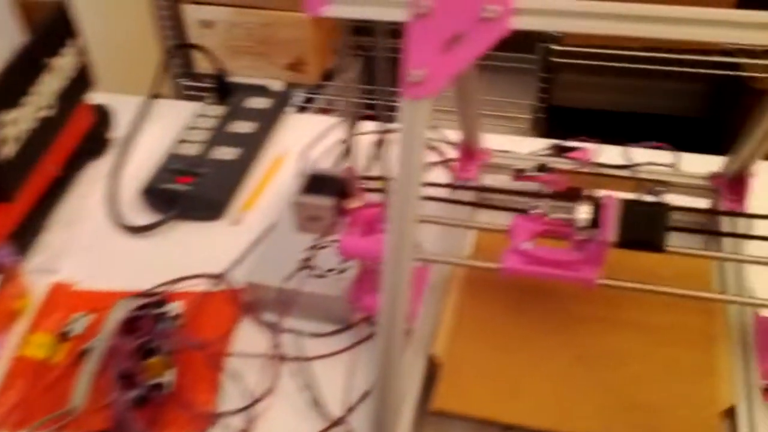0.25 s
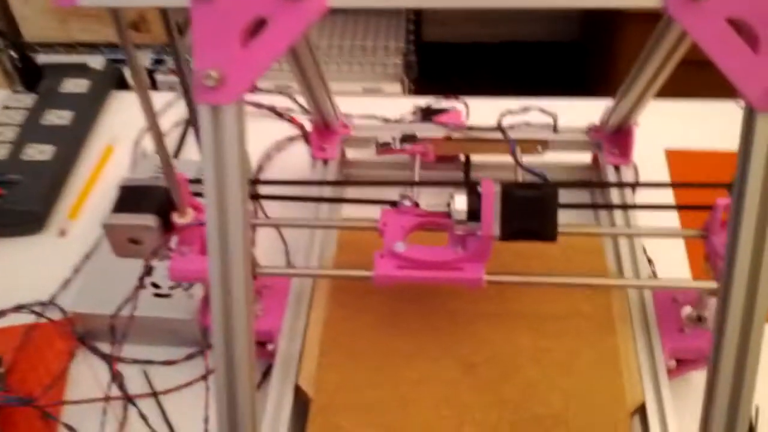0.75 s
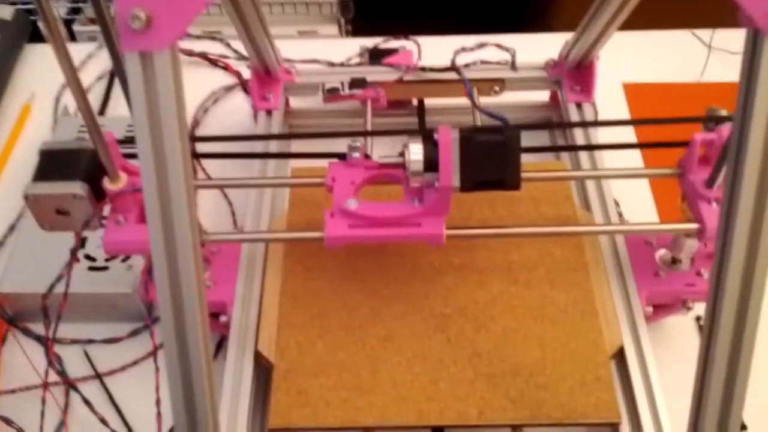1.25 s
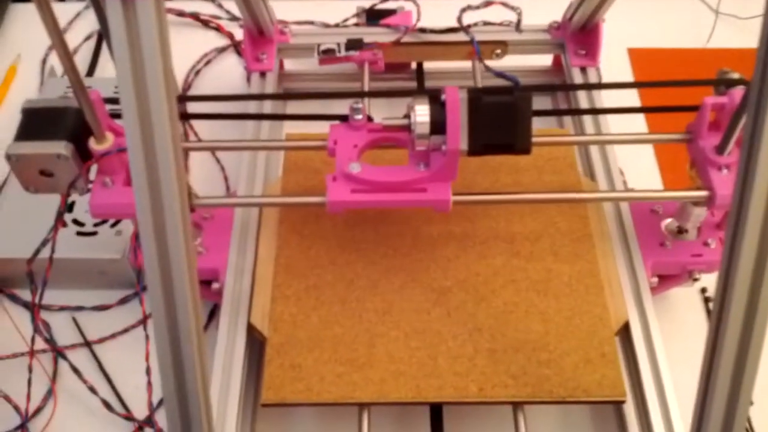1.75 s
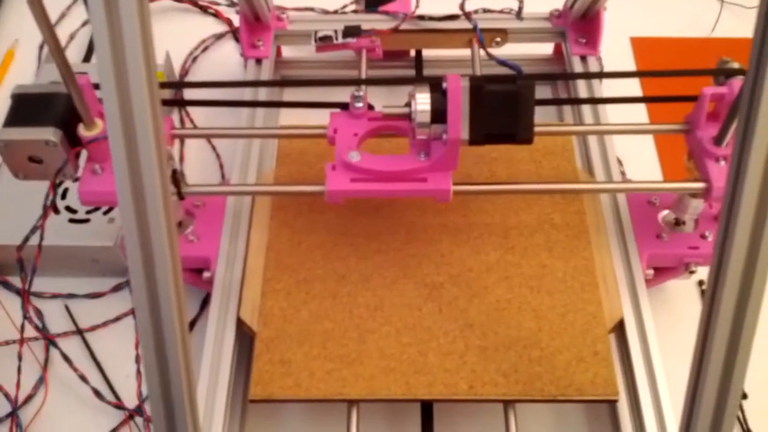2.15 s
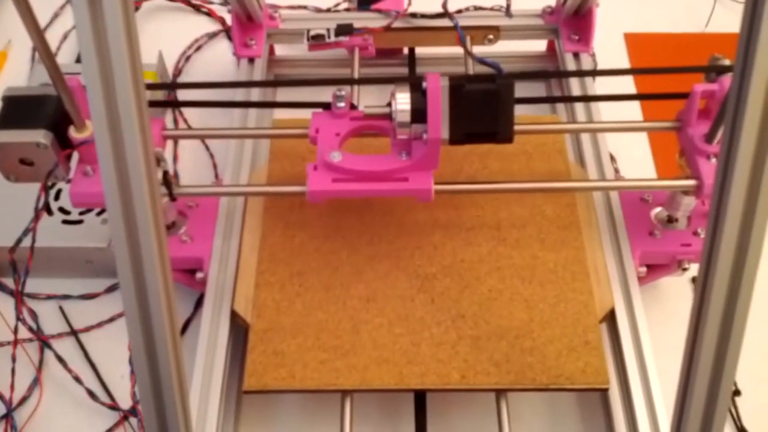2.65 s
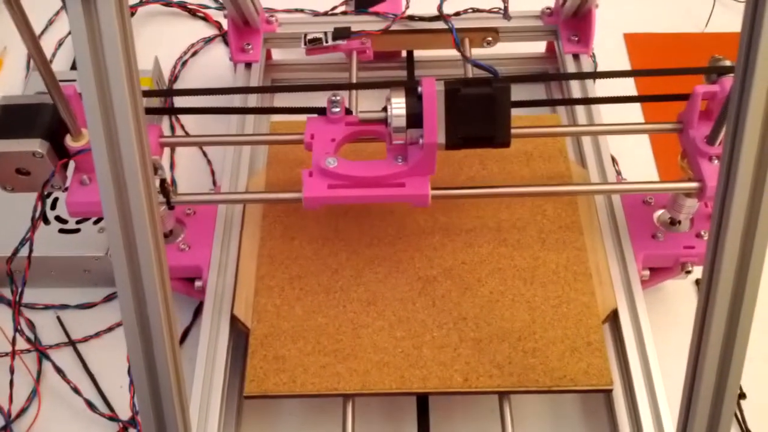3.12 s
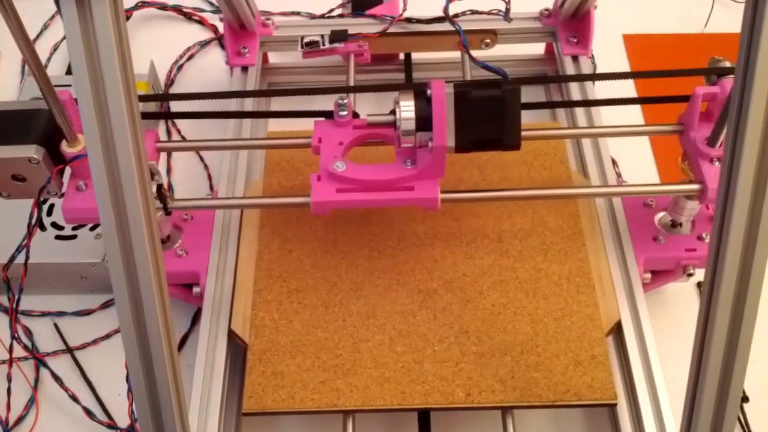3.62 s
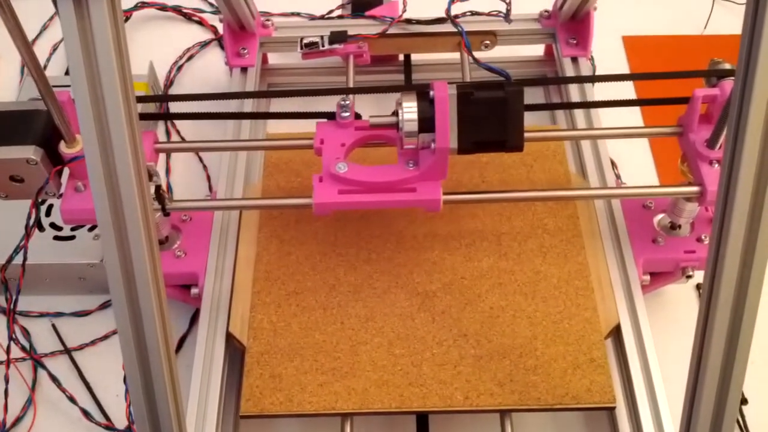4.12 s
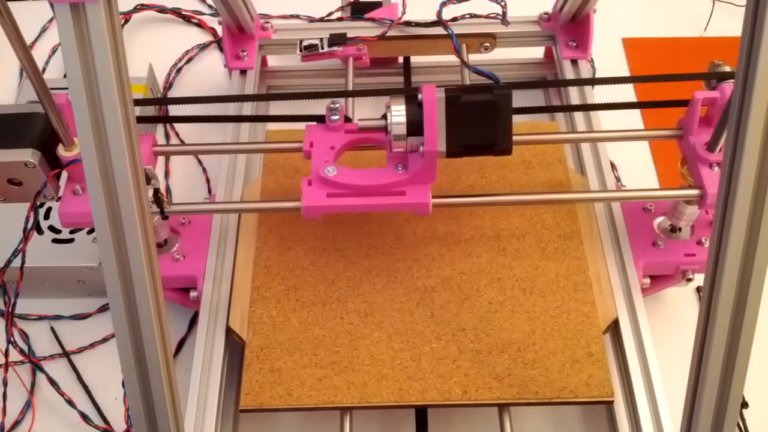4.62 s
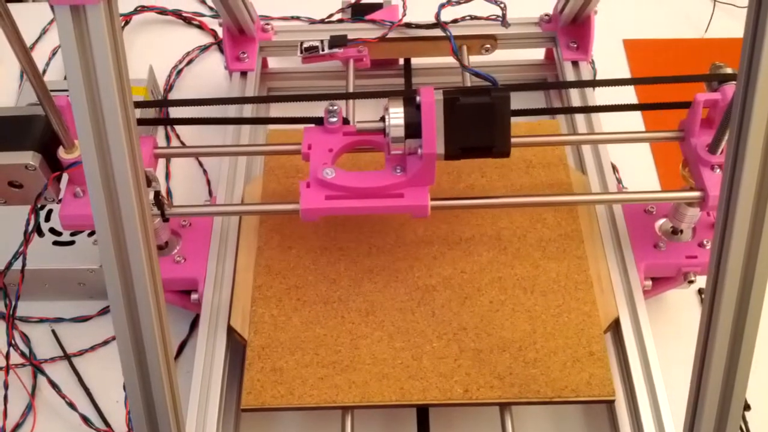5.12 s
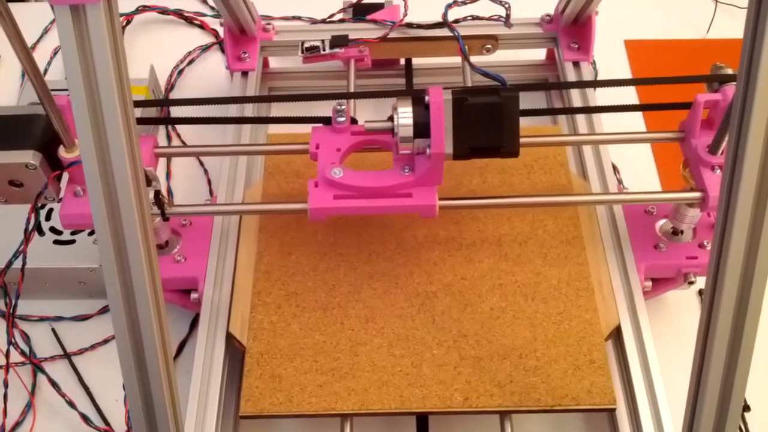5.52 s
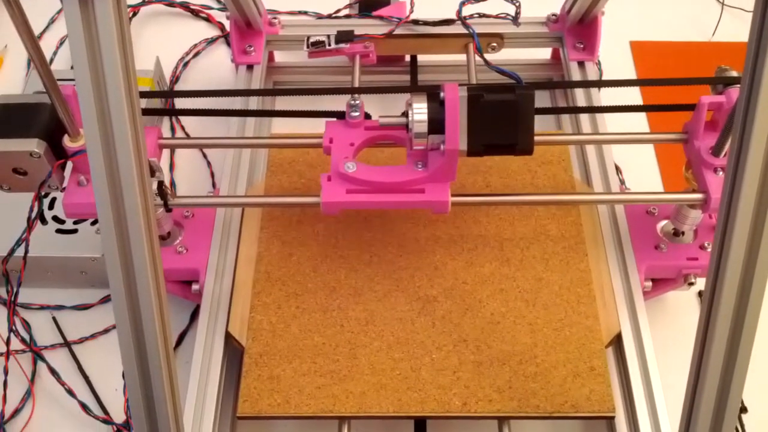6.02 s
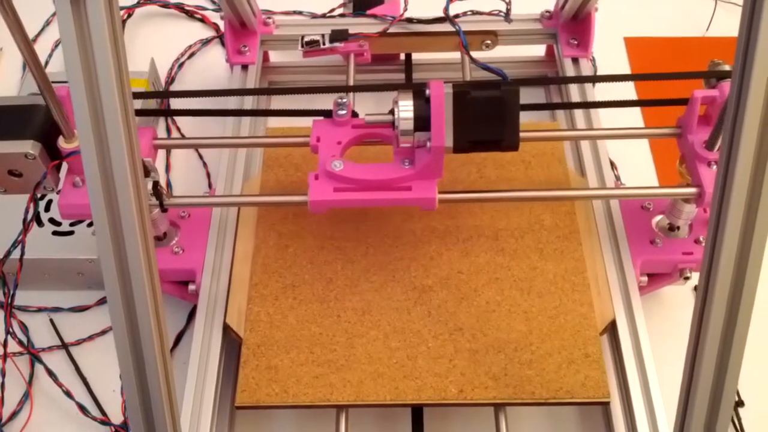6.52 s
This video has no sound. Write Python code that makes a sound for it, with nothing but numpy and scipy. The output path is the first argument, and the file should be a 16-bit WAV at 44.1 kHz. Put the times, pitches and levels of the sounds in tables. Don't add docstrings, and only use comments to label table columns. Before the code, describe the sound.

A desktop printer's motors sing a steady high whine over a low frame hum, broken about once a second by quick side-step chirps and knocks.

```python
import sys
import numpy as np
from scipy import signal
from scipy.fft import rfft, irfft, next_fast_len
from scipy.io import wavfile
from scipy.ndimage import uniform_filter1d

SR = 44100
rng = np.random.default_rng(int(sys.argv[2]) if len(sys.argv) > 2 else 0)


def file_out(sig):
    cols = np.atleast_2d(sig).T
    lim = np.clip(cols, -1, 1)
    pcm = np.round(lim * 32767).astype(np.int16)
    wavfile.write(sys.argv[1], SR, pcm)


def voltage_ratio(decibels):
    exponent = np.asarray(decibels, float) / 20
    return 10 ** exponent


N = 298109

STEP_HZ = 2030.1

# (start [s], end [s], middle tones [dB], treble as the microphone turns [dB], bearing chatter [dB])
STROKES = [
    (-.1, 0.021, -1, -12, -75),
    (0.101, 0.63, -2.5, -7, -87.5),
    (0.71, 1.318, -1, -4.5, -69),
    (1.397, 2.09, -0.5, 0, -73.5),
    (2.172, 2.942, -0.5, -0.5, -70.5),
    (3.029, 3.883, 0.5, 0, -89),
    (3.966, 4.91, 0, 0, -70.5),
    (4.99, 6.016, 0.5, 1, -93),
    (6.094, 7.006, 1, 1.5, -71),
]
# (frequency [Hz], density [dB per Hz])
HISS = [(25, 0), (70, -3), (140, 3), (280, -0.5), (450, -11.5), (750, -5.5), (1300, -5.5), (1800, -12),
        (2300, -6.5), (3200, -17), (7500, -15.5), (10500, -4), (13000, -15), (16000, -11)]
# (time [s], peak level [dB], shake of table and hand [dB])
TAKE_UPS = [
    (0.702, -33, 0),
    (2.165, -30, -8),
    (3.958, -32, -5),
    (6.088, -34, -4),
]


def unit(x):
    return x / np.sqrt(np.mean(x ** 2) + 1e-20)


def in_time(rows):
    s, *columns = np.transpose(rows)
    return [np.interp(np.arange(N) / SR, s, column) for column in columns]


def colour(x, spectrum, peaks=()):
    hz, db = np.transpose(spectrum)
    size = next_fast_len(len(x))
    grid = np.maximum(np.fft.rfftfreq(size, 1 / SR), 1)
    curve_db = np.interp(np.log(grid), np.log(hz), db)
    for centre, width, peak_db in peaks:
        curve_db += peak_db * np.exp(-2 * ((grid - centre) / width) ** 2)
    return unit(irfft(rfft(x, size) * voltage_ratio(curve_db), size)[:len(x)])


def noise(spectrum, peaks=()):
    return colour(rng.standard_normal(N), spectrum, peaks)


def drift(rate):
    knots = rng.standard_normal(400)
    return np.interp(np.arange(N) / SR * rate, np.arange(400), knots)


def add(out, s, x):
    i = min(int(round(s * SR)), N)
    out[i:i + len(x)] += x[:N - i]


def ring(hz, t60, rise, count=2500):
    t = np.arange(count) / SR
    x = np.sin(2 * np.pi * hz * t) * voltage_ratio(-60 * t / t60) * (1 - np.exp(-t / rise))
    return x / np.max(np.abs(x))


def burst(spectrum, decay, rise=0.000097):
    t = np.arange(1500) / SR
    return colour(rng.standard_normal(1500), spectrum) * np.exp(-t / decay) * (1 - np.exp(-t / rise))


def gate(t, start, end, rise, fall):
    return (1 - np.exp(-np.maximum(t - start, 0) / rise)) * np.exp(-np.maximum(t - end, 0) / fall)


def shaken(rest_db, shaken_db, rise, calm):
    t = np.arange(N) / SR
    tremble = sum(voltage_ratio(shaken_db + db) * gate(t, s, s + rise, rise / 2, calm) for s, _, db in TAKE_UPS)
    return voltage_ratio(rest_db) + tremble


def room(x):
    t60_s, gap_s, level_db = 0.14, 0.004, -9
    t = np.arange(SR // 4) / SR
    tail = colour(rng.standard_normal(len(t)), [(150, -17), (500, -1), (3000, -6), (12000, -8)])
    tail *= voltage_ratio(-60 * t / t60_s) * (t > gap_s)
    tail /= np.sqrt(np.sum(tail ** 2))
    return x + voltage_ratio(level_db) * signal.fftconvolve(x, tail)[:N]


def hiss():
    # (frequency [Hz], width [Hz], level [dB])
    top_peaks = [(2640, 440, -15), (5730, 180, -0.5), (7330, 223, -6.5), (8560, 140, -5.5), (9400, 250, -9),
                 (9860, 310, 4), (10500, 1000, -3.5), (12310, 340, 7.5), (12500, 450, -4), (14020, 480, 6)]
    air = noise(HISS, top_peaks)
    top = signal.sosfilt(signal.butter(4, 8500, "high", fs=SR, output="sos"), air)
    air += top * (voltage_ratio(0.48 * drift(44.0)) - 1)
    table = noise([(220, -49), (310, 7.5), (480, 1.0), (700, 5.0), (1000, -57)])
    hand = noise([(10, -20.5), (35, 2), (70, 1), (120, -38)])
    table *= shaken(rest_db=-70.5, shaken_db=-65, rise=0.22, calm=0.18)
    hand *= shaken(rest_db=-80, shaken_db=-70, rise=0.5, calm=0.01)
    return voltage_ratio(-57) * air + table + hand


def hand_brush():
    # (time [s], level [dB])
    brush_course = [
        (1.5, -90),
        (1.506, -51),
        (1.525, -49),
        (1.55, -53),
        (1.575, -58),
        (1.6, -66),
    ]
    # (frequency [Hz], density [dB per Hz])
    brush_colour = [(710, -66), (1200, -24), (1980, -8.5), (2150, -13), (3950, -17.5), (5130, -23),
                    (10400, -20), (16000, -23)]
    return voltage_ratio(in_time(brush_course)[0] + 2.0 * drift(49.0)) * noise(brush_colour)


def fan_rub():
    # (time [s], level [dB])
    rub_course = [(0, -58), (.15, -46.5), (.45, -49.5), (.65, -51.5), (1.2, -58), (2.0, -56), (3.0, -55),
                  (4.0, -53.5), (6.76, -57)]
    # (frequency [Hz], density [dB per Hz])
    rub_colour = [(9000, -27.5), (10300, -7), (11200, 0.5), (12100, -3.5), (15500, -32)]
    # (frequency [Hz], density [dB per Hz])
    housing_colour = [(1500, -30), (2300, 1), (2900, -3), (3600, -7.5), (5000, -32)]
    fan_hz, first_s = 20.55, 0.0016
    out = voltage_ratio(in_time(rub_course)[0] - 16.5) * noise(rub_colour)

    turned_db, = in_time([((start + end) / 2, treble_db) for start, end, _, treble_db, _ in STROKES])
    out += voltage_ratio(-78 - 0.87 * turned_db) * noise(housing_colour)

    for k, s in enumerate(np.arange(first_s, N / SR, 0.5 / fan_hz)):
        size, late, pitch = rng.standard_normal(3)
        db = np.interp(s, *np.transpose(rub_course)) - 10 * (k % 2) + 1 + 2.5 * size
        scuff = burst(rub_colour, 0.005, rise=0.002)
        scuff += 0.35 * ring(11300 * 1.025 ** pitch, 0.035, 0.002, count=1500)
        click = burst([(8000, -25), (10500, 0), (14500, -2), (16000, -8)], 0.0012)
        scuff[130:] += 0.68 * click[:-130]
        add(out, abs(s - 0.003 + 0.00086 * late), voltage_ratio(db) * scuff)
    return out


def chatter():
    out = np.zeros(N)
    for start, end, _, _, chatter_db in STROKES[1:]:
        times = np.arange(start + 0.03, min(end, N / SR), 32 / STEP_HZ)
        for s, (size, pitch, late) in zip(times, rng.standard_normal((len(times), 3))):
            db = chatter_db + 13 + 4 * size - 10 * (s - start)
            tick = ring(1280 * 1.05 ** pitch, 0.025, 0.0004) + 0.9 * ring(960 * 1.08 ** late, 0.03, 0.0003)
            tick[:1500] += 0.438 * burst([(400, 3), (700, 26), (1450, -13), (1800, -18)], 0.0083)
            add(out, s + 0.00146 * late, voltage_ratio(db) * tick[:1500])
    return out


def knocks():
    # (delay [s], level [dB], ring frequency [Hz])
    rebounds = [
        (0, -2.5, 1290),
        (.005, -11, 1150),
        (.039, -8, 990),
        (.062, -14, 1020),
    ]
    # (time [s], peak level [dB])
    stops = [
        (0.087, -44),
        (1.322, -34.5),
        (2.094, -44),
        (3.012, -42),
        (3.891, -43),
        (4.911, -34),
        (4.933, -36.5),
        (6.019, -44),
    ]
    # (time [s], peak level [dB], part [1 belt clamp or 0 bearing])
    rattles = [(0.819, -46, 0.14), (0.866, -47, 0), (1.022, -44, 0.039), (1.056, -39, 0),
               (1.212, -44, 0.12), (2.454, -41, 1), (2.487, -41, 0), (2.52, -44, 0), (2.738, -44, 1),
               (2.77, -44, 0), (4.077, -43.5, 1), (4.125, -40, 0), (4.234, -44, 1), (4.313, -41, 0.01),
               (6.205, -33, 0), (6.331, -40, 1), (6.362, -41, 0), (6.408, -46, 1), (6.441, -42, 1)]
    stop_hz, bearing_hz, clamp_hz = 1230, 980, 1294
    events = [(s + late, db + loss_db, hz) for s, db, _ in TAKE_UPS for late, loss_db, hz in rebounds]
    events += [(s, db, stop_hz) for s, db in stops]
    events += [(s, db, clamp_hz if clamp else bearing_hz) for s, db, clamp in rattles]
    out = np.zeros(N)
    for s, db, hz in events:
        body = ring(hz, 0.019, 0.000098)
        body += 0.74 * ring(hz * 0.74, 0.0036, 0.00017)
        body += 0.068 * ring(524, 0.027, 0.001)
        body[:1500] += 0.39 * burst([(500, -18), (1000, 23.5), (1600, -7), (3000, 6), (6000, -22)], 0.0084)
        add(out, s, -voltage_ratio(db - 5.5) * body)
    return out


def ticks_and_snaps():
    # (time [s], peak level [dB], broad crack [dB])
    ticks = [(0.6993, -50.5, 0.5), (1.378, -59, 6), (2.1046, -51, -5), (2.1264, -61, -6),
             (2.1541, -46.5, -8.5), (2.161, -62, -5), (3.9502, -43.5, -11), (4.9097, -56, -4),
             (5.1004, -57, -1), (6.0789, -37.5, -5.5), (6.2047, -65, -1)]
    # (time [s], peak level [dB])
    snaps = [
        (0.4344, -42),
        (1.709, -42),
        (1.7529, -47),
        (2.9894, -44),
        (4.2692, -41),
        (5.5493, -42),
        (5.69, -46),
    ]
    out = np.zeros(N)
    for s, db, crack_db in ticks:
        add(out, s, voltage_ratio(db - 3.0) * ring(3590, 0.015, 0.00045))
        add(out, s, voltage_ratio(db + crack_db) * burst([(1500, 4.5), (7000, -1.5), (9000, -16)], 0.012))
    for s, db in snaps:
        add(out, s, voltage_ratio(db - 5) * burst([(7000, -20), (9000, -3), (11500, 0), (15500, -4)], 0.002))
    return out


def jolts():
    # (time [s], level [dB])
    line_starts = [
        (.1, -44.5),
        (0.702, -48),
        (1.381, -39.5),
        (2.162, -45.5),
        (3.021, -44.5),
        (3.961, -45),
        (4.98, -42.5),
        (6.105, -45.5),
    ]
    # (first [Hz], second: delay [s], level [dB], frequency [Hz])
    swings = [
        (233, 0.023, -16, 153),
        (169, 0.0369, 0, 133),
    ]
    mode = dict(t60=0.12, rise=0.003, count=10000)
    out = np.zeros(N)
    for j, (s, db) in enumerate(line_starts):
        hz, late, second_db, second_hz = swings[j % 2]
        add(out, s, voltage_ratio(db) * ring(hz, **mode))
        add(out, s + late, voltage_ratio(db + second_db) * ring(second_hz, **mode))
    return out


def side_steps():
    # (step tone [dB], 2nd [dB], 3rd harmonic [dB], whistle [dB], braking [dB])
    step_levels = [
        (-69, -70, -68.5, -79, -67),
        (-63, -79, -80, -58.5, -57.5),
    ]
    # (time after line end [s], share of side-step rate [1], level [dB])
    brake_stages = [
        (.042, .8, 0),
        (.052, .6, -2),
        (.063, .4, -4),
        (.074, .58, -5),
    ]
    # (frequency [Hz], density [dB per Hz])
    shudder_colour = [(40, -8), (170, 11.5), (330, 1), (700, -2), (1300, -6.5), (2400, -14), (4500, -28),
                      (8000, -37)]
    # (time after line end [s], level [dB])
    shudder_course = [(0, -4), (.01, 0.5), (.05, -2), (.075, 3.5), (.1, -1.5), (.16, -8), (.25, -51)]
    whistle_hz = 10970
    flicker_db = 4.0
    facing_share = 0.32
    shudder_levels_db = (-54, -53)

    out, t = np.zeros(N), np.arange(int(0.25 * SR)) / SR
    stage_s, share, stage_db = np.transpose(brake_stages)
    stage = np.searchsorted(stage_s, t)
    rate_hz = np.sqrt(2) * STEP_HZ * uniform_filter1d(np.r_[1, share][stage], size=70)
    brake_level = uniform_filter1d((stage > 0) * voltage_ratio(np.r_[0, stage_db][stage]), size=90)
    brake_level *= gate(t, 0, 0.091, 0.001, 0.0045)
    cruising = gate(t, 0, stage_s[0], 0.001, 0.012)
    whistling = gate(t, 0, 0.063, 0.0032, 0.0037) * np.sin(2 * np.pi * whistle_hz * t)
    course = voltage_ratio(np.interp(t, *np.transpose(shudder_course)))

    for j, (_, end, _, treble_db, _) in enumerate(STROKES[:-1]):
        near = 1 - j % 2
        *harmonics_db, whistle_db, braking_db = step_levels[near]
        facing_db = facing_share * treble_db
        uneven = np.repeat(rng.standard_normal(len(t) // 60 + 1), 60)[:len(t)] * (stage > 0)
        turn = 2 * np.pi * np.cumsum(rate_hz * (1 + 0.044 * uneven)) / SR
        flicker = flicker_db * uniform_filter1d(uneven, size=120)
        x = voltage_ratio(braking_db + flicker) * brake_level * (np.sin(turn) + 0.2 * np.sin(2 * turn))
        for k, db in enumerate(harmonics_db):
            tone = np.sin((k + 1) * 2 * np.pi * rate_hz[0] * t)
            x += voltage_ratio(db + facing_db * (k > 0)) * cruising * tone
        x += voltage_ratio(whistle_db + facing_db) * whistling
        shudder = course * colour(rng.standard_normal(len(t)), shudder_colour)
        add(out, end, np.sqrt(2) * x + voltage_ratio(shudder_levels_db[near]) * shudder)
    return out


def motors():
    # (multiple of the electrical cycle [1], level on lines out [dB], on lines back [dB])
    orders = [(3, -72, -73), (4.5, -80, -75), (6, -73, -74), (7, -73, -69), (10.5, -76, -65),
              (21, -71, -73), (22, -74, -76), (36, -70, -68), (40, -67, -68), (53.5, -72, -87),
              (76, -98, -83), (104, -87, -85), (108, -86, -83), (138.5, -80, -82), (191, -82, -83),
              (192, -69, -70), (193, -80, -84), (202.5, -84, -83), (257, -84, -79), (126, -85, -85),
              (255, -84, -79), (319, -69.5, -72), (320, -71.5, -73), (321, -78, -69), (383, -77, -79),
              (385, -77, -75), (447, -90, -81)]
    # (multiple 12 [dB], 16 [dB], 24 [dB], 28 [dB])
    pairing = [(-74, -72.5, -76.5, -74), (-71, -82, -74, -83), (-75, -70, -68.5, -67),
               (-67.5, -69, -68, -67), (-74.5, -72, -72.5, -67), (-76.5, -74, -67.5, -68),
               (-71, -91, -68.5, -66.5), (-74.5, -73.5, -73, -67.5), (-74, -68, -71, -67)]
    # (full-step tone [dB], octave start [dB], end [dB], half-rate tone start [dB], end [dB])
    hum = [(-70, -54, -53.5, -66, -67.5), (-56, -55, -62.5, -64, -57), (-61, -53.5, -48, -59.5, -67),
           (-55, -55, -55.5, -66, -59.5), (-60, -49.5, -48.5, -64, -64), (-54.5, -50, -49.5, -66.5, -59.5),
           (-59.5, -50.5, -51, -66, -63), (-54, -48.5, -48.5, -71, -60.5), (-60.5, -58, -59, -63, -67)]
    # (microstep tone start [dB], end [dB], 2nd harmonic [dB], 4th start [dB], end [dB])
    whine = [(-49, -54, -69, -95, -93), (-51, -60, -68.5, -86, -88), (-55, -53.5, -68.5, -77, -67),
             (-55.5, -56, -66.5, -70.5, -82), (-55, -55.5, -68.5, -72.5, -66),
             (-58, -57, -67.5, -69.5, -70.5), (-55.5, -56, -69, -70.5, -67),
             (-58.5, -57.7, -67.5, -69.5, -72), (-55.5, -55.6, -68.5, -74, -69)]
    # (one cycle below [dB], one cycle above [dB])
    side_lines_db = [
        (-6, -11.5),
        (-9, -15),
    ]
    side_lines_rad = (1.6, -2.6)
    second_climb_db = (-5.5, 2.5)
    hum_fade_db_per_s = (123, 58)
    flutter_db = (0.6, 2.2)
    hum_build_db, hum_build_s = 6, 0.032
    half_sag_db, cyclic_db = 1, -66

    out, time = np.zeros(N), np.arange(N) / SR
    cycle = 2 * np.pi * STEP_HZ / 64
    phases = rng.uniform(0, 2 * np.pi, (len(STROKES), 40))
    one_cycle = rng.standard_normal(round(64 * SR / STEP_HZ))
    contact_noise = colour(np.resize(one_cycle, N), HISS[5:])
    swell_db = [drift(3) for _ in range(5)]
    flutter = drift(19)

    for j, (start, end, middle_db, treble_db, _) in enumerate(STROKES):
        span = slice(max(0, int(start * SR)), min(N, int((end + 0.15) * SR)))
        t, back, phase = time[span], 1 - j % 2, phases[j]
        along = np.clip((t - start) / (min(end, N / SR) - start), 0, 1)
        full_db, octave0, octave1, half0, half1 = hum[j]
        step0, step1, second_db, fourth0, fourth1 = whine[j]

        quick = gate(t, start - 0.006, end, 0.0014, 0.0059)
        ringing = gate(t, start, end, 0.008, 0.012)
        following = STROKES[j + 1][0] if j + 1 < len(STROKES) else end
        slow = gate(t, start, following, 0.031, 0.0067)

        tones = []
        for order, *levels_db in orders:
            facing_db = treble_db if order > 150 else middle_db * (order < 70)
            tones.append((order, levels_db[back] + swell_db[int(order) % 5][span] + facing_db))
        tones += list(zip((12, 16, 24, 28), pairing[j]))
        half_db = half0 + (half1 - half0) * along - half_sag_db * np.sin(np.pi * along)
        fourth_db = fourth0 + (fourth1 - fourth0) * along
        second_db = second_db + second_climb_db[back] * (along - 0.5)
        below_db, above_db = side_lines_db[back]
        tones += [(32, half_db), (256, fourth_db)]
        tones += [(127, second_db + below_db), (128, second_db), (129, second_db + above_db)]
        last = len(tones) - 1
        phase[last] = 2 * phase[last - 1] - phase[last - 2] + side_lines_rad[back]
        phase[16] = 2 * phase[15] - phase[14] + np.pi

        x = quick * sum(voltage_ratio(db) * np.sin(order * cycle * t + p) for (order, db), p in zip(tones, phase))
        step_db = step0 + (step1 - step0) * along
        x += ringing * voltage_ratio(step_db) * np.sin(64 * cycle * t + phase[-1])
        ease_db = -hum_build_db * np.exp(-(t - start) / hum_build_s)
        ease_db -= hum_fade_db_per_s[back] * np.maximum(t - end, 0)
        unsteady_db = flutter_db[back] * flutter[span]
        x += slow * voltage_ratio(full_db + ease_db + unsteady_db) * np.sin(4 * cycle * t + phase[-2])
        octave_db = octave0 + (octave1 - octave0) * along
        x += slow * voltage_ratio(octave_db + ease_db) * np.sin(8 * cycle * t + phase[-3])
        out[span] += np.sqrt(2) * x + voltage_ratio(cyclic_db + treble_db) * quick * contact_noise[span]
    return out


def scene():
    background = hiss() + hand_brush() + fan_rub()
    struck = chatter() + room(knocks() + ticks_and_snaps() + jolts())
    mono = background + struck + side_steps() + motors()
    return np.array([mono, mono])


def band_limit(x):
    return signal.sosfilt(signal.butter(12, 16610, fs=SR, output="sos"), x)


def record(dry):
    cutoff_hz, offset = 15790, -0.00034
    size = next_fast_len(N)
    passed = rfft(dry, size) * (np.fft.rfftfreq(size, 1 / SR) < cutoff_hz)
    return band_limit(irfft(passed, size)[:, :N] + offset)


dry = scene()
out = record(dry)
file_out(out)
```